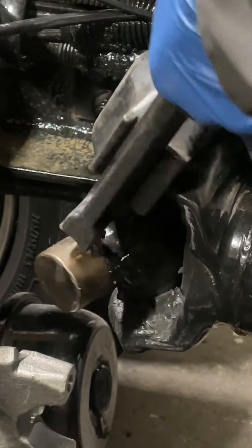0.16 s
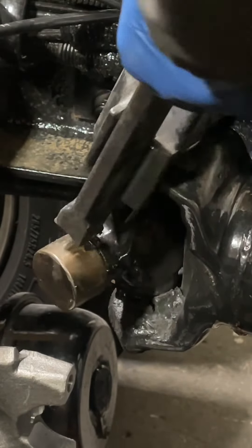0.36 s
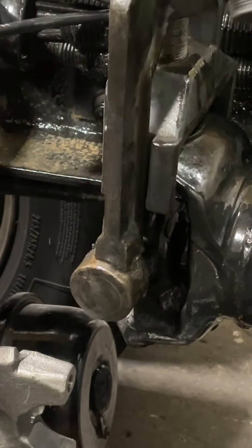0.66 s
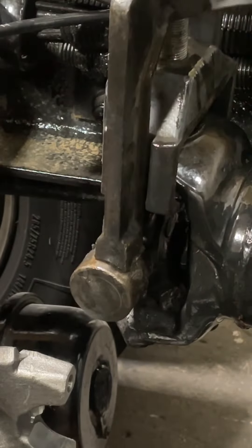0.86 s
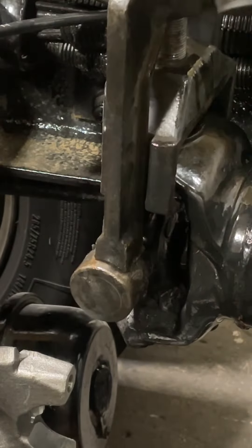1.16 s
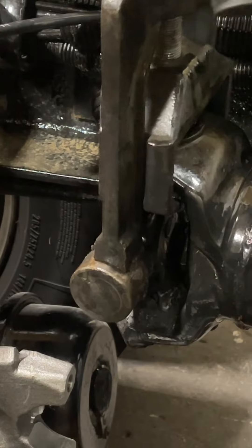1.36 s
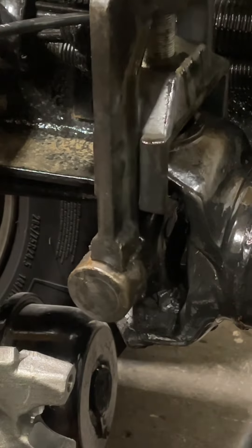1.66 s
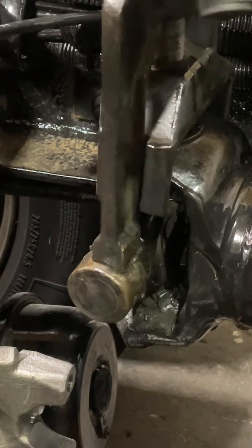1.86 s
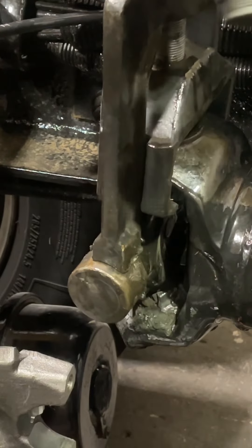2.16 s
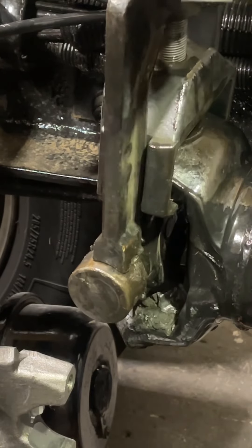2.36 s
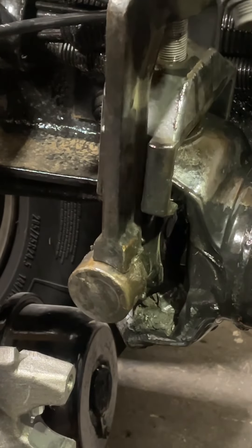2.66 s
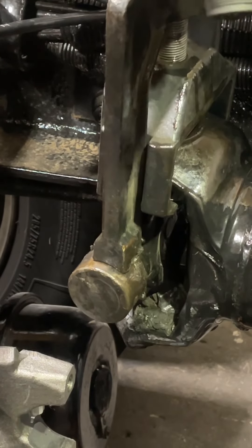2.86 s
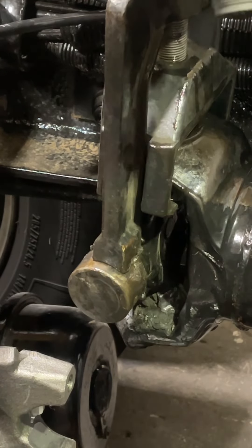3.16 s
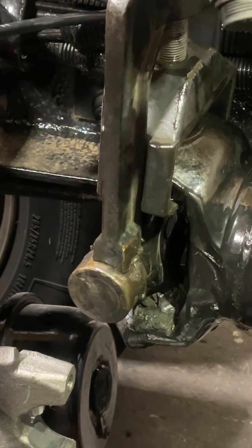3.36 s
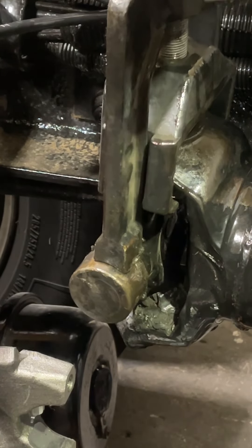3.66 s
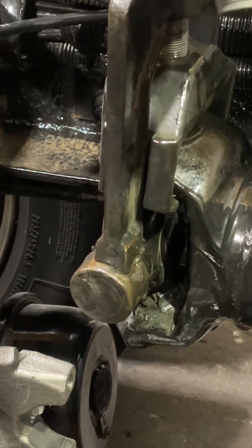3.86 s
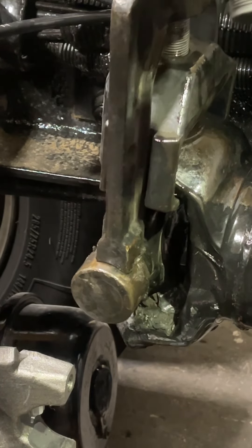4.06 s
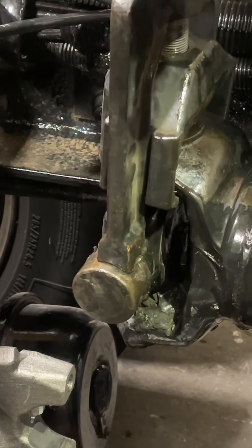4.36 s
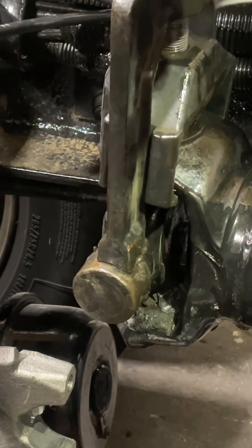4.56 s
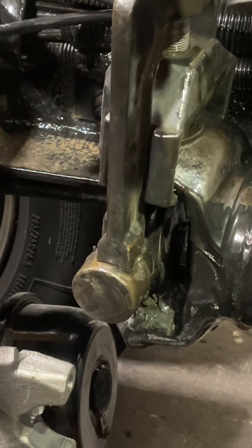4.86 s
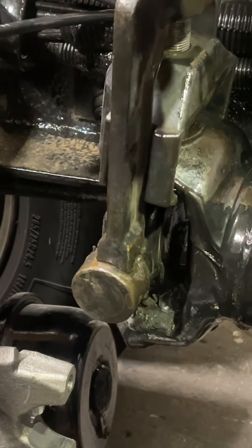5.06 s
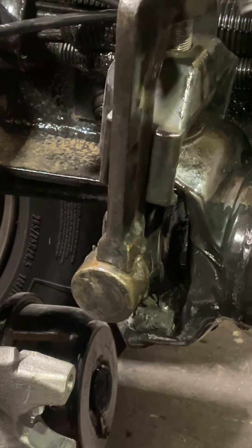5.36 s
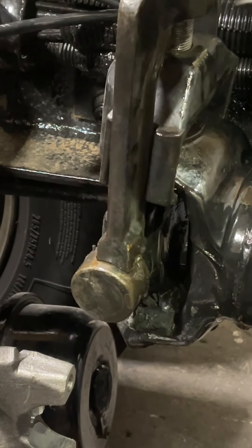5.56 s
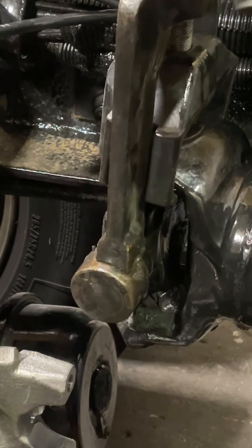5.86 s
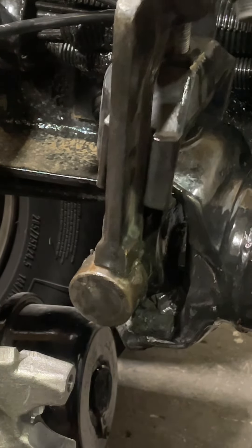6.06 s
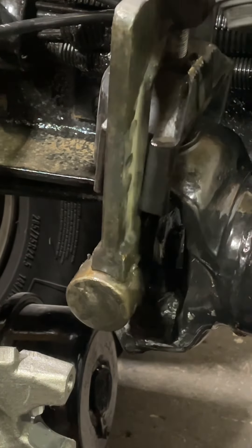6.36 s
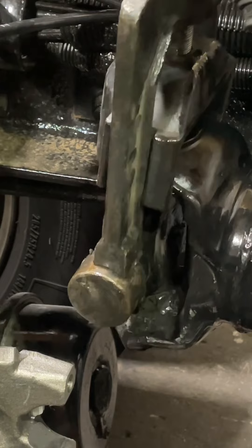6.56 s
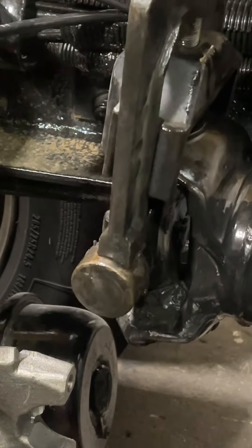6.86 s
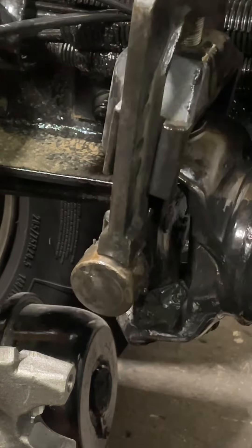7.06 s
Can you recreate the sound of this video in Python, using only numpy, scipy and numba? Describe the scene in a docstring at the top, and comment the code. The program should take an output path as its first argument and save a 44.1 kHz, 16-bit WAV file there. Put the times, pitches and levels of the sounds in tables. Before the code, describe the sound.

Close phone microphone under a truck: steel jaws tap and knock, a dull thud follows, and a small steel piece lands with a quick jingling scatter over shop rumble and hiss. Then an air tool lurches on, its raspy whirr under rapid ringing metal blows, growing louder. The blows drop out, leaving the motor's whirr, a rough clunk and a brief gap, before a second, brighter burst shakes the chassis until the end.

```python
"""Air impact tool on a steel puller

An air impact tool winds the screw of a steel puller in two bursts, close to a phone under a truck.
Each blow rings decaying modes of puller and chassis and adds a noise crack, over the filtered-noise whirr
of the air motor. Loose steel clinks with ringing modes of its own, and knocks ring the puller's modes.
Shop hum and air-line hiss lie behind; left and right are turned in phase, nearly opposite around 9 kHz."""
import sys
import numpy as np
from scipy import signal
from scipy.fft import rfft, irfft, next_fast_len
from scipy.io import wavfile
from scipy.ndimage import uniform_filter1d
from numba import njit

SR = 44100
rng = np.random.default_rng(int(sys.argv[2]) if len(sys.argv) > 2 else 0)


def bounce(signal):
    """Save signal as a 16-bit WAV file at the path given by the first command-line argument."""
    frames = np.transpose(np.atleast_2d(signal))
    limited = np.clip(frames, -1, 1)
    pcm = np.round(limited * 32767).astype(np.int16)
    wavfile.write(sys.argv[1], SR, pcm)


N = 317961

# hammer blows, levels over a usual blow:
# (time [s], body [dB], body note [Hz], chassis thud [dB], clang [dB], ping [dB])
BLOWS = [(3.3444, -3, 496, 2, 1.5, 0.5), (3.3898, 1, 483, 2.5, 1.5, 2), (3.4407, 1, 505, -1, -2, -2),
         (3.493, -2.0, 494, 0.5, 1.5, -1.0), (3.544, -2.0, 494, 1.5, -2.5, -2.5),
         (3.597, -3, 512, 1, 2.5, 1), (3.649, -2.0, 517.0, 1.5, 0.5, 1.0), (3.702, -0.5, 517, -0.5, 1, 3),
         (3.754, 1, 519, -0.5, 0.5, -1), (3.8074, 3, 526, 1, 0.5, -4), (3.8632, 2.5, 512, -2, 1, -1),
         (3.917, 2, 517, -1, 1, 0.5), (3.968, 2, 525, 2, 5.5, 1), (4.025, 1.5, 500, 1, 3, 1),
         (4.0779, 2, 529.0, -0.5, -1.5, -2.0), (4.129, 2.5, 523, 1, -1, 0.5),
         (4.1817, 0.5, 527.0, 0, 0.0, 1.5), (4.239, -1.5, 508, -0.5, 2.5, 2),
         (4.293, -3.5, 525, -3.5, -1.0, -3.5), (4.346, -1, 513, -1.5, 1, -1), (4.3996, 0, 500, 0.5, -2, 1),
         (4.4531, 2.5, 500, 0.5, 2, 1.0), (4.505, 1.5, 503.0, -1, -2.5, -3), (4.558, 1.5, 501, 0.5, 1, 1.5),
         (4.6099, 2.5, 507, 3, 0.5, -2), (4.6641, 1, 489, 1, 2, -1), (4.72, 3.5, 504, -1, 0.5, 2.5),
         (4.77, 2, 514, 0, 4.5, -2), (4.8233, 3.5, 500, 0, 1.5, 1), (4.88, 6.5, 485, -4, 2.5, -1.0),
         (4.932, -1.5, 492, -1, 1, 0.5), (4.9838, 3, 476, 0, 2, 0.5), (5.037, 7.5, 516, -1.5, 2, -1.5),
         (5.0932, 8.5, 494, -0.5, 3, -1.5), (5.1557, 5, 500, 1, 3, 1.5), (5.2165, 4, 515, 1.5, 2.5, -0.0),
         (5.2802, 6, 500.0, -2.0, 3.0, -0.5), (5.3292, 8.5, 504, 3, 5.5, 3), (5.397, 6, 479, -0.5, 6, 2.5),
         (6.2526, 4, 484, -1, 12, 3.5), (6.304, 4.5, 502, 2, 6.5, 0), (6.42, 7, 492, 4, 6, 2.5),
         (6.4799, 6, 497, 5, 7, 1.5), (6.5395, 6, 462, 6, 3.5, 1.5), (6.5959, 5.5, 480, 7, 6, 1.5),
         (6.6567, 7.5, 459, 4, 5.5, 1.5), (6.7268, 8, 482, 2, 8.5, 1), (6.7928, 6.5, 498, 5, 7.5, 3.5),
         (6.855, 3.5, 503, 3, 9, 2.5), (6.9154, 5, 493, -3, 7, 4.5), (6.9663, 3, 496, 6.5, 7.5, -5),
         (7.018, 4.5, 506, 4, 8, 2.0), (7.0712, 2.5, 506, -3, 4, -2), (7.127, 5.5, 510.0, 4, 7, 1),
         (7.1831, 2, 495, 1.5, 9, 2.5)]
# what the tool works against: hammering, spinning free, slowing, braking, catching, hammering, tightening,
# bottoming: (from [s], whirr [dB], whirr treble against whirr [dB], chassis shake [dB])
LOADS = [(3.2, -32.5, 3, -44.5), (5.44, -31, 0.5, -59), (5.7, -32, 1.5, -57), (5.98, -35.5, -10, -28.5),
         (6.2, -32.5, 2.5, -40.5), (6.43, -27.5, 1, -35.5), (6.83, -26.5, 0, -32.5), (6.96, -27, 1, -28.5)]
BODY_HZ = 522
SEATS_S = 6.35  # the jaws seat deeper before the second burst's run of blows
SIDE_SIGNS = np.array([[1], [-1]])  # left, right


def undb(db):
    """Amplitude ratio of a level in dB."""
    return 10 ** (np.asarray(db) / 20)


def read(table, hz):
    """A table's value at each frequency, straight on a log axis."""
    f, v = np.transpose(table)[:2]
    return np.interp(np.log(hz + 1), np.log(f + 1), v)


def shape(x, gain):
    """Filter along the last axis by gain(Hz)."""
    n = next_fast_len(x.shape[-1])
    hz = np.arange(n // 2 + 1) * SR / n
    return irfft(rfft(x, n) * gain(hz), n)[..., :x.shape[-1]]


def unit(x):
    """Scale to an rms of 1."""
    return x / np.sqrt(np.mean(x ** 2))


def walk(rate_hz):
    """Random levels held 1 / rate_hz and slewed twice; spread near 1."""
    k = int(SR / rate_hz)
    steps = np.repeat(rng.standard_normal(N // k + 1), k)
    return 1.13 * uniform_filter1d(uniform_filter1d(steps, k), k)[:N]


@njit
def follow(x, attack, release):
    """Envelope that rises fast and falls slowly."""
    e, out = 0., np.empty(len(x))
    for i in range(len(x)):
        e += (x[i] - e) * (attack if x[i] > e else release)
        out[i] = e
    return out


def shop():
    """Rumble that wavers, smooth hiss, and the hum of mains-driven motors."""
    # rumble and air-line hiss: (frequency [Hz], level [dB per Hz])
    noise_floor = [(30, -62), (42, -62), (65, -62), (100, -71.5), (200, -76), (500, -84), (1200, -91),
                   (3000, -89), (5200, -88), (6500, -84), (9500, -77), (11500, -87), (12700, -100),
                   (15000, -104)]
    # (frequency [Hz], level [dB rms])
    hum_lines = [(45, -58), (59.5, -54), (91, -52), (119.5, -50.5), (134, -61.5), (179, -58.5), (240, -61),
                 (359, -71), (587, -78)]
    noise = rng.standard_normal((2, N))
    mid, side = shape(noise, lambda f: undb(read(noise_floor, f)) * np.sqrt(SR / 2))
    rumble = shape(mid, lambda f: 1 / (1 + (f / 400) ** 2))
    hiss = mid - rumble
    out = hiss * undb(0.5 * walk(1.84)) + rumble * undb(0.47 * walk(8.4))
    for hz, db in hum_lines:
        level = undb(db + 3.95 * walk(11)) * np.sqrt(2)
        cycles = np.cumsum(hz * (1 + 0.0083 * walk(3.03))) / SR
        out = out + level * np.sin(2 * np.pi * cycles)
    return out + 0.54 * side * SIDE_SIGNS


def room(x, wet_db):
    """A tail of dense echoes, thin in the bass and losing its treble first, different left and right."""
    # (frequency [Hz], decay by 60 dB [s])
    room_t60 = [(100, 0.63), (500, 0.93), (1300, 0.84), (1900, 0.66), (2900, 0.58), (4700, 0.6),
                (7000, 0.56), (11000, 0.2)]
    t, tail = np.arange(SR) / SR, 0
    for hz in 90 * 2 ** np.arange(0, 7.6, .5):
        noise = rng.standard_normal((2, SR))
        band = shape(noise, lambda f: np.exp(-(np.log2((f + 1) / hz) / .3) ** 2))
        tail = tail + min(hz / 1100, 1) * band * np.exp(-np.log(1000) * t / read(room_t60, hz))
    tail = tail * (1 - np.exp(-t / 0.0007)) / np.sqrt(np.sum(tail ** 2) / 2)
    return x + undb(wet_db) * signal.fftconvolve(x[None], tail, axes=1)[:, :N]


def drive(t, load_db, kick_db):
    """Gain of a motor layer: trigger times load, with a lurch at each start, spun up fast and run down slowly."""
    # trigger: (pulled [s], let go [s])
    pulls = [(3.318, 6.03), (6.23, 7.3)]
    kick_s = 0.022  # lurch as the rotor starts
    leak_s, leak_db = 0.039, -11  # the valve leaks a little before it opens
    spin_up_s, run_down_s = 0.0083, 0.028
    air = 0
    for on, off in pulls:
        lurch = undb(kick_db * np.exp(-np.maximum(t - on, 0) / kick_s))
        leak = ((t >= on - leak_s) & (t < on)) * undb(leak_db)
        air = air + ((t >= on) & (t < off)) * lurch + leak
    stage = np.searchsorted(np.array(LOADS)[1:, 0], t)
    return follow(air * undb(load_db)[stage], 1 / (spin_up_s * SR), 1 / (run_down_s * SR))


def motor():
    """Vanes and gears chatter in the casing; the rotor stalls at each blow and winds up again."""
    # casing resonances: (frequency [Hz], width [Hz], relative level [dB])
    casing_modes = [(472, 63, -3.5), (837, 48, -2), (963, 98, -1), (1150, 28, 1), (2056, 35, -5),
                    (2690, 230, -6), (3980, 71, -7.5), (4260, 67, -19.5), (4750, 43, -6), (5450, 66, -12),
                    (6150, 46, -8.5), (6680, 76, -9.5)]
    # (frequency [Hz], relative level [dB])
    whirr_colour = [(200, -6), (680, -12.5), (1050, -2.5), (1600, -10), (3000, -12), (4900, -13),
                    (6000, -21), (9000, -7.5), (11300, -16), (12600, -29), (15000, -71)]
    # (frequency [Hz], relative level [dB])
    shake_colour = [(30, -15), (50, 5.5), (75, 4), (95, -10), (112, -4), (140, 2.5), (170, 0.5), (210, 1.5),
                    (250, 1), (320, -8), (500, -4.5), (900, -53)]
    kick_whirr_db, kick_shake_db = 6, 14
    # the rotor housing sings as the hammer winds up, less once the jaws are seated
    rotor_hz, rotor_width_hz, rotor_db, rotor_seated_db = 1190, 48, -9.5, -6.5
    rotor_stall_db, rotor_stall_s, rotor_stall_width_s = -12, .013, .011

    t = np.arange(N) / SR
    whirr_db, treble_db, shake_db = np.transpose(LOADS)[1:]
    blows = np.r_[0, np.array(BLOWS)[:, 0]]
    since = t - blows[np.searchsorted(blows, t, "right") - 1]  # s after the last blow
    stall = np.exp(-((since - .012) / 0.0037) ** 2)
    jolt_db = 6.6 * np.exp(-((since - .014) / 0.17) ** 2)  # the chassis shakes most just after a blow

    def casing(f):
        power = undb(2 * read(whirr_colour, f))
        peaks = sum(undb(2 * db + 5.0) / (1 + ((f - hz) / w * 2) ** 2) for hz, w, db in casing_modes)
        return np.sqrt(power + peaks)

    burst_db = 1.2 * rng.exponential(size=N // 30 + 1).repeat(30)[:N]
    chatter = rng.standard_normal((2, N)) * undb(burst_db)
    whirr = unit(shape(chatter, casing))
    song = unit(shape(chatter[0], lambda f: 1 / (1 + ((f - rotor_hz) / rotor_width_hz) ** 2)))
    hammering = since < .075
    song_dip_db = rotor_stall_db * np.exp(-((since - rotor_stall_s) / rotor_stall_width_s) ** 2)
    whirr[0] += song * undb(rotor_db + rotor_seated_db * (t > SEATS_S) + hammering * (2.5 + song_dip_db))

    low = shape(whirr, lambda f: 1 / (1 + (f / 2000) ** 4))
    treble = (whirr - low) * undb(-1.5 * stall) * drive(t, whirr_db + treble_db, kick_whirr_db)
    low = low * undb(-5 * stall) * drive(t, whirr_db, kick_whirr_db)
    mid, side = (low + treble) * undb(0.9 * walk(25))
    shake = unit(shape(rng.standard_normal(N), lambda f: undb(read(shake_colour, f))))
    shake = shake * drive(t, shake_db, kick_shake_db) * undb(jolt_db)
    return mid + shake + 0.62 * side * SIDE_SIGNS


def strike(times, colour_db, modes, scatter_db, rise_cycles, crack_db, crack_s, lead_s, rattle, length,
           tune=1, push_s=0, late_s=0, hold=lambda hz, after: 1):
    """Each hit rings the modes and cracks; colour_db(Hz) gives one row of levels per hit."""
    # (frequency [Hz], relative level [dB])
    crack_colour = [(300, -1), (700, -9), (1200, 3.5), (3000, -3), (6000, -14.5), (9000, 7.5),
                    (11500, -6.5), (12800, -18), (15000, -46)]
    # modes that start against their neighbour, so each pair swells and beats: [Hz]
    opposed_hz = [112, 465]
    hz, db, t60 = np.transpose(modes)
    t, lead = np.arange(length) / SR, int(lead_s * SR)
    out = np.zeros(N + length + lead)
    chance = rng.standard_normal((len(times), 3, len(hz)))  # pitch, phase, level
    # low modes answer every hit alike, high ones depend on the contact
    fickle = np.clip((hz - 380) / 700, 0, 1)

    swell = np.exp((t - lead_s) / lead_s * 0.98)
    burst = np.where(t < lead_s, swell, np.exp(-(t - lead_s) / crack_s))
    noise = rng.standard_normal((len(times), length)) * burst
    cracks = shape(noise, lambda f: undb(crack_db + read(crack_colour, f) + colour_db(f)))

    swing = np.where(np.isclose(hz[:, None], opposed_hz, rtol=.06).any(1), -1, 1)
    pitches = hz * tune * np.ones((len(times), 1))
    gains = swing * undb(db + colour_db(hz))
    # s since each mode was set going, high modes last
    after = np.maximum(t - push_s * np.clip((hz[:, None] - 500) / 600, 0, 1), 0)
    held = hold(hz[:, None], after)
    early = int((push_s - late_s) * SR)
    fade = np.minimum(1, (length - np.arange(length)) / (length / 4))
    for s, pitch, gain, c, crack in zip(times, pitches, gains, chance, cracks):
        f = (pitch * (1 + 0.006 * c[0]))[:, None]
        # heavy parts take a few cycles to get moving
        rise = 1 - np.exp(-after * f / rise_cycles)
        envelope = rise * np.exp(-np.log(1000) * after / t60[:, None]) * held
        # loose contacts keep jolting the ring, which smears each line
        steps = rng.standard_normal((len(hz), length // 16))
        jolts = rattle * np.cumsum(steps, axis=1).repeat(16, axis=1)
        phase = fickle[:, None] * (3 * c[1][:, None] + jolts)
        ring = np.sin(2 * np.pi * f * after + phase) * envelope
        start = int(s * SR)
        ring_at = start + lead - early
        out[ring_at:ring_at + length] -= (gain * undb(scatter_db * fickle * c[2])) @ ring * fade
        crack_at = start + int(late_s * SR)
        out[crack_at:crack_at + length] += crack * fade ** 2
    return out[lead:lead + N]


def clinks(table, modes, gain_db, crack_db, rattle):
    """Hard steel on steel; brightness tilts each hit in dB an octave, and the spot struck favours one mode."""
    s, db, tilt, spot_hz = np.array(table).T[:, :, None]
    spot_db, spot_octaves = 7, 0.083

    def colour(f):
        slope = tilt * np.log2(np.maximum(f, 600) / 3000)
        bass_cut = 6 * np.log2(np.maximum(400 / (f + 1), 1))
        favour = spot_db * np.exp(-(np.log2((f + 1) / spot_hz) / spot_octaves) ** 2)
        return db + gain_db + slope - bass_cut + favour

    return strike(s[:, 0], colour, modes, scatter_db=1.2, rise_cycles=0.56, crack_db=crack_db,
                  crack_s=0.0062, lead_s=0.00037, rattle=rattle, length=24000)


def jaw_taps():
    """The puller jaw set on the yoke rings its steel modes, most short, a few lingering."""
    # (time [s], relative level [dB], brightness [dB an octave], favoured [Hz])
    taps = [(.008, -34.5, -7, 1010), (.0244, -14, -0.5, 3230), (.031, -22.5, -2, 1020),
            (.4275, -29, -6.5, 800), (.433, -28, -5, 4300), (.441, -44, -13.5, 2300),
            (.452, -30.5, -7, 1390), (.461, -40, -5, 3170), (.474, -45, -9, 800)]
    # (frequency [Hz], relative level [dB], decay by 60 dB [s])
    jaw_modes = [(780, -13, 0.022), (1020, -14.5, 0.037), (1530, -22, 0.046), (1910, -18, .04),
                 (2247, -19, 0.25), (2390, -17, .05), (2540, -20, .2), (2790, -19, 0.13),
                 (3080, -3.5, 0.019), (3480, -7, 0.038), (3900, -19, 0.14), (3820, -4.5, .03),
                 (4300, -17, 0.2), (4340, 1, 0.027), (4700, -2, 0.025), (5860, -10, 0.1),
                 (7000, -1.5, 0.057), (8060, -10, .02), (10250, -6, 0.074)]
    return clinks(taps, jaw_modes, gain_db=-2.0, crack_db=1.0, rattle=0.18)


def dropped_part():
    """A loose steel part dropped and bouncing rings anew at each landing."""
    # (time [s], relative level [dB], brightness [dB an octave], favoured by the spot it lands on [Hz])
    bounces = [(1.931, -31.5, -3.5, 2500), (1.944, -9.5, 3.5, 6940), (1.9465, -13.5, 3.5, 2040),
               (1.948, -17.5, 0.5, 1190), (1.968, -27, -1.5, 1660), (1.9878, -15, 2.5, 7080),
               (1.995, -17, 3, 11200), (2.035, -21, -1, 6000), (2.043, -28, -1, 1000),
               (2.057, -22.5, -2.5, 1170), (2.063, -35, -4, 2700)]
    # (frequency [Hz], relative level [dB], decay by 60 dB [s])
    part_modes = [(300, -14, 0.063), (530, -10, 0.032), (999, -7.5, 0.067), (1197, -3.5, 0.043),
                  (1753, -31, 1), (1860, -31.5, 1), (1690, -11, 0.052), (2044, -6, 0.029),
                  (2560, -11.5, 0.055), (2840, -14.5, 0.095), (4400, -17, 0.17), (4570, -8, 0.06),
                  (5010, -7, 0.071), (5360, -17, .04), (5960, -9, 0.076), (6050, -11, 0.08),
                  (6440, -9.5, 0.095), (6940, -12.5, 0.061), (7080, -15, 0.068), (7900, -23, 0.07),
                  (9200, -25, 0.057), (10250, -20, 0.06), (11150, -18, 0.088), (11900, -24, 0.05)]
    return clinks(bounces, part_modes, gain_db=-1.1, crack_db=0.5, rattle=0.25)


def on_puller(times, colour, note_hz, **how):
    """Hits that ring the puller's modes; the body note shifts as the jaws slip and bite."""
    # puller and chassis: (frequency [Hz], relative level [dB], decay by 60 dB [s])
    puller_modes = [(76, 0.5, 0.2), (112.8, 4.5, 0.13), (167, 0.5, 0.11), (248.9, -3.5, 0.13),
                    (297, -13.5, 0.13), (455.7, -0.5, 0.042), (533, 2.5, 0.085), (600, -10.5, 0.076),
                    (676, -12.5, 0.041), (836, -13.5, 0.089), (1015, 0.5, 0.072), (1166, -14, 0.06),
                    (1340, -6, 0.086), (1820, -1.5, 0.06), (2097, -4.5, 0.018), (2860, -15.5, 0.065),
                    (3544, -12.5, 0.091), (3960, -13.5, 0.1), (4340, -6, 0.016), (5110, -15.5, 0.047),
                    (5730, 2.5, 0.017), (6830, -16, 0.032), (8046, -0.5, 0.042)]
    body = np.abs(np.log2(np.array(puller_modes)[:, 0] / BODY_HZ)) < .3
    tune = (note_hz / BODY_HZ) ** body
    return strike(times, colour, puller_modes, tune=tune, length=6400, rattle=.2, **how)


def knocks():
    """Below the body note a knock slopes to its thud; above it, brightness tilts the shared colour."""
    # dull knocks and thuds: handling, the part landing, a rebound, trigger and stopping clunk:
    # (time [s], puller body [dB], chassis thud [dB], brightness [dB an octave])
    knock_hits = [(0.384, -39, -34, -15), (0.4347, -33, -57, -7), (0.456, -32.5, -60, -7),
                  (0.5578, -41, -48, -11), (1.2019, -29, -28.5, -10.5), (1.944, -41, -25, -10),
                  (3.3089, -26.5, -16, -14.5), (3.3611, -14.5, -46, -10.5), (5.45, -30, -35, -11),
                  (5.9744, -13, -24.5, -5), (6.228, -18.5, -13.5, -6.5)]
    # (frequency [Hz], level against the body [dB])
    knock_colour = [(520, -5), (1600, -10.5), (4200, -3), (5800, 5), (9000, -10)]
    thud_hz = 120
    s, db, thud, tilt = np.array(knock_hits).T[:, :, None]

    def octaves(f):
        return np.log2((f + 1) / BODY_HZ)

    def colour(f):
        deep = np.clip(octaves(f) / octaves(thud_hz), 0, 1)
        return db + (thud - db) * deep + read(knock_colour, f) + tilt * np.maximum(octaves(f), 0)

    return on_puller(s[:, 0], colour, BODY_HZ, scatter_db=2.0, rise_cycles=1.0, crack_db=21.0,
                     crack_s=0.011, lead_s=.001)


def grip(hz, after):
    """Modes swell while hammer and anvil are locked; then the jaws bite and change their level, mostly muting."""
    # (frequency [Hz], swell [s], muted at [s], level once bitten [dB])
    grip_modes = [(250, .002, 0.029, -1), (517, 0.011, 0.016, -6), (755, .004, 0.012, 1),
                  (1020, 0.011, 0.016, -13), (1200, .001, .006, -12), (1340, 0.0039, .024, -5),
                  (1820, 0.0038, 0.012, -4), (2600, 0.00088, .02, -4)]
    bite_s = 0.0017
    at, *columns = np.transpose(grip_modes)
    swell, muted, db = (read(np.c_[at, c], hz) for c in columns)
    open_share = 1 / (1 + np.exp(np.minimum((after - muted) / bite_s, 50)))
    return np.minimum(after / swell, 1) ** 1.63 * (undb(db) + (1 - undb(db)) * open_share)


def hammer():
    """Every blow shares one colour, bent by its own thud, body, clang and ping and by the chance of the contact."""
    # a usual blow from chassis to treble: (frequency [Hz], level [dB], scatter [dB])
    blow_colour = [(124, -23, -1.5), (483, -17.5, .5), (1560, -25.5, -0.5), (4220, -28.5, 4.5),
                   (5900, -21.5, .5), (8800, -28.5, 3.5)]
    # deeper-seated jaws favour other modes: (frequency [Hz], level change [dB])
    seated_colour = [(500, -2), (630, 9), (860, 2), (1030, 2.5), (1195, -7), (1350, 5), (1820, -0.5),
                     (2070, -1.5), (2790, 1)]
    s, body, note_hz, thud, clang, ping = np.array(BLOWS).T[:, :, None]
    hz, db, scatter = np.transpose(blow_colour)
    bend = np.c_[thud, body, clang, clang, ping, ping]
    levels = db + bend + scatter * rng.standard_normal((len(s), len(hz)))

    def colour(f):
        blows = np.array([read(np.c_[hz, row], f) for row in levels])
        return blows + (s > SEATS_S) * read(seated_colour, f)

    # the hammer loads the heavy parts push_s before its steel face pings
    return on_puller(s[:, 0], colour, note_hz, scatter_db=1.9, rise_cycles=1.0, crack_db=8.5,
                     crack_s=0.0025, lead_s=.003, push_s=0.004646, late_s=.0008, hold=grip)


def scene():
    """Shop and motor, with the steel and the tool's blows each in the room's echoes."""
    steel = room(dropped_part() + jaw_taps(), wet_db=-10.5)
    tool = room(hammer() + knocks(), wet_db=-5.5)
    return shop() + motor() + steel + tool


def record(dry):
    """Gain control ducks after loud hits; left and right are turned in phase; peaks rounded, bottom and top cut."""
    # (frequency [Hz], phase by which left leads right [rad])
    stereo_phase = [(0, 0), (1120, -0.2), (4050, 0.8), (4650, 1.8), (5250, 5.5), (5510, 6.2), (6290, 6.4),
                    (8350, 9.3), (9560, 9.5), (11400, 11.6), (11800, 12.6), (14000, 12.5), (14900, 15.6),
                    (15300, 15.7)]
    # level of the stereo difference: (frequency [Hz], gain [dB])
    side_gain = [(60, -116), (200, -17.5), (700, -0.5), (1900, -11.5), (4500, -6), (6000, -15), (7300, 0),
                 (9100, -34.5), (11000, 6), (12400, -62), (14300, -18)]
    top_hz, ceiling = 15730, .95
    loud = follow(np.abs(dry).max(0), 1 / (0.00072 * SR), 1 / (.12 * SR))
    dry = dry * np.minimum(1, undb(-7.5) / (loud + 1e-9)) ** 0.6
    dry = signal.sosfilt(signal.butter(12, 40, "high", fs=SR, output="sos"), dry)
    side = shape((dry[0] - dry[1]) / 2, lambda f: undb(read(side_gain, f)))
    hz, radians = np.transpose(stereo_phase)
    # left and right each turn by half the phase
    turn = lambda f: np.exp(.5j * np.interp(f, hz, radians) * SIDE_SIGNS)
    stereo = shape(dry.mean(0) + side * SIDE_SIGNS, turn)
    rounded = ceiling * np.tanh(stereo / ceiling)
    return signal.sosfilt(signal.ellip(10, .2, 80, top_hz, fs=SR, output="sos"), rounded)


dry = scene()
out = record(dry)
bounce(out)
```